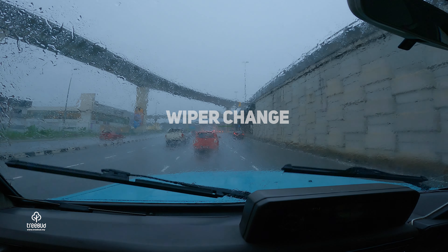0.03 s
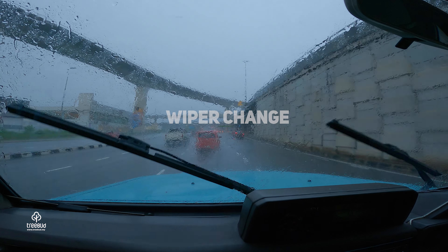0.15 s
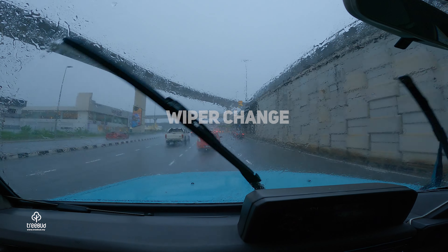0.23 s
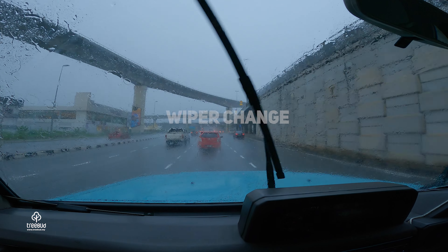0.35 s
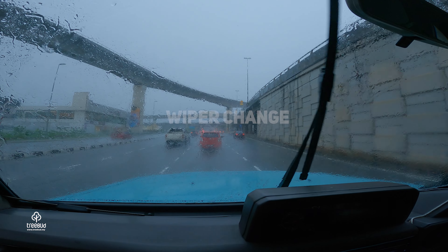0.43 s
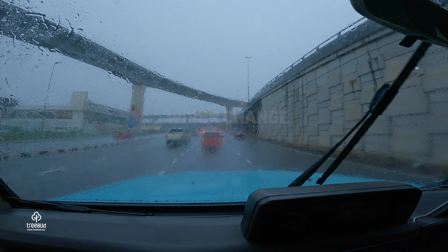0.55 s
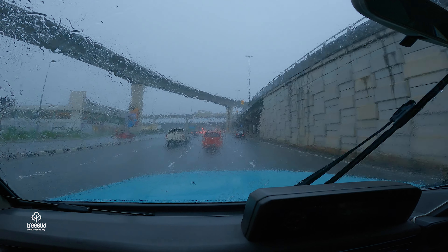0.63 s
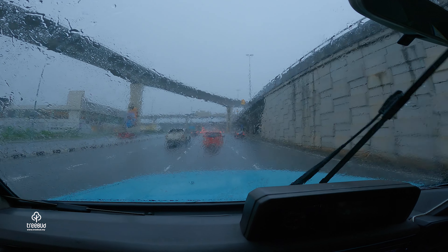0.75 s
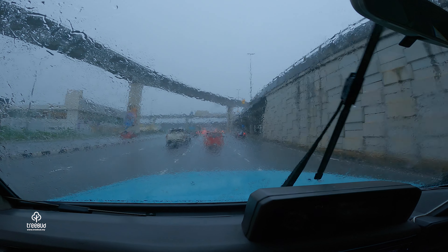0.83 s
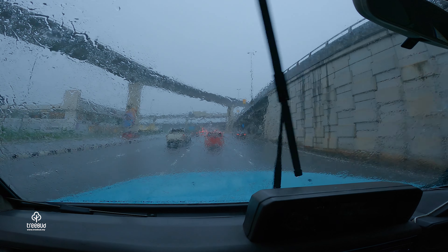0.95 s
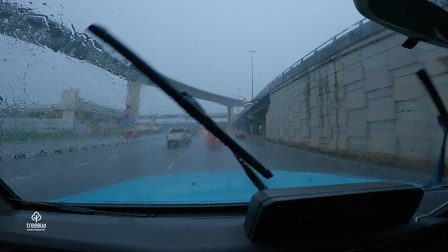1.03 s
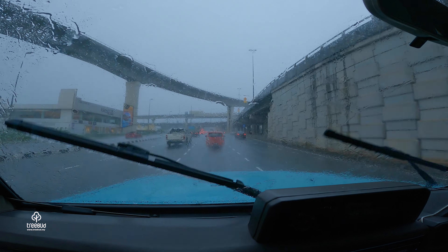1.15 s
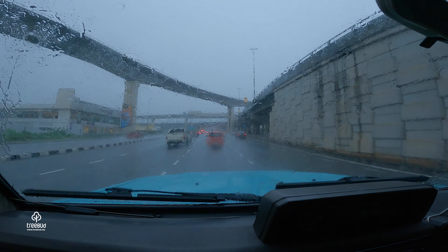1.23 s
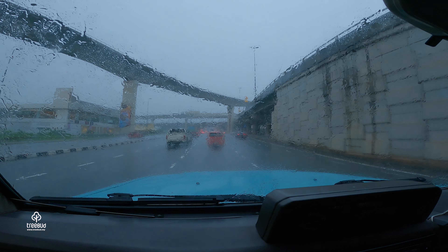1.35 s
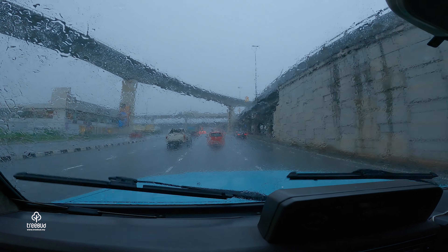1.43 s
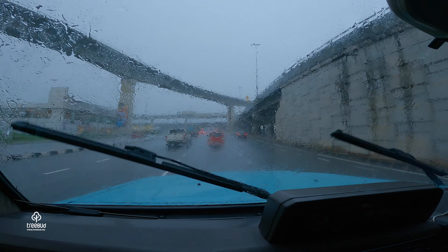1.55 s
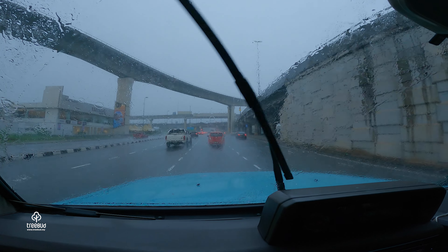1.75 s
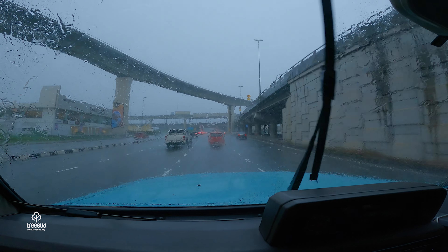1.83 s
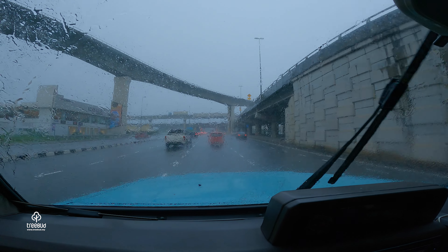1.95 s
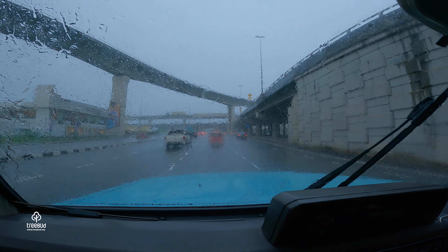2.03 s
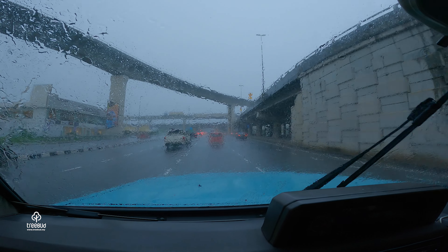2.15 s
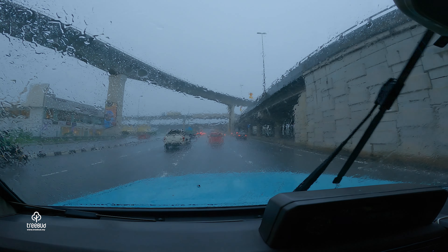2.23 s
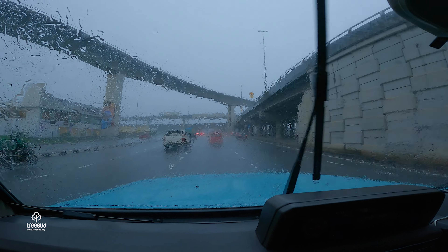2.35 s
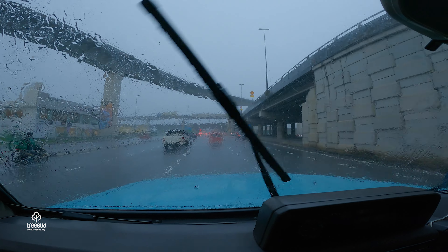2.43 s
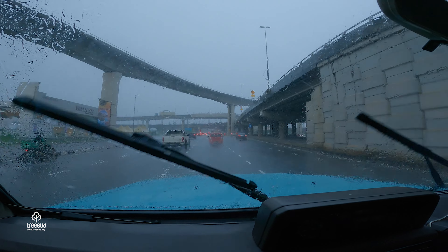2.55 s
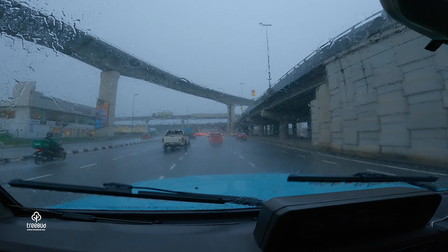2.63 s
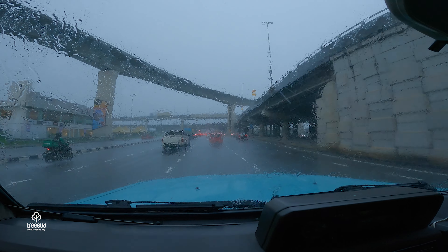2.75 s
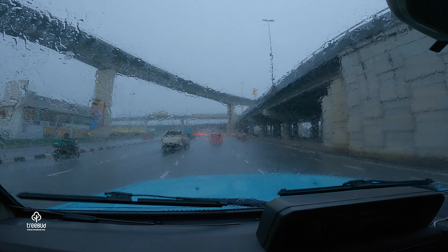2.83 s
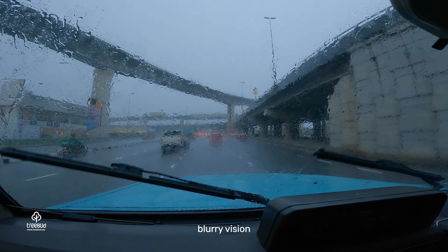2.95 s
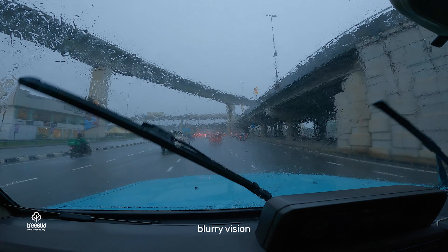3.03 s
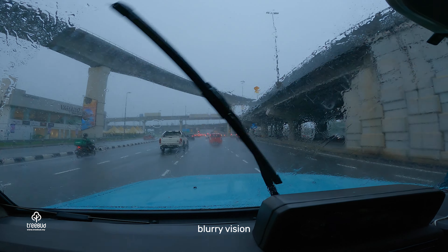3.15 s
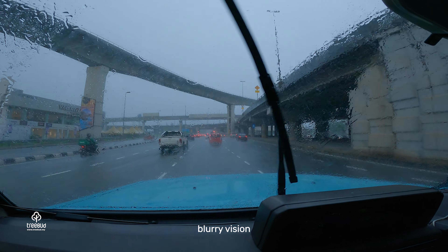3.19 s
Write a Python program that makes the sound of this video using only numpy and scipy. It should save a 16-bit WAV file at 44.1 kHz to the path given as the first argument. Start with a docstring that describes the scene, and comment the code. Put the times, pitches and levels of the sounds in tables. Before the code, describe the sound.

Inside a car driving through rain, wipers knock regularly over tapping drops and engine rumble, fading to a soft, dull roar.

```python
"""Inside a car driving through heavy rain. Drops tap the glass and roof over a hiss of spray. The engine drones
at its firing rate over tyre roar and the rumble of the body shaking on its springs. The wipers thud at the end
of each sweep, then click twice as the rubber blades flip over. Near the end these fade out as a soft, duller
roar with a faint whine fades in."""
import sys
import numpy as np
from scipy import signal
from scipy.fft import rfft, irfft, next_fast_len
from scipy.io import wavfile
from scipy.ndimage import uniform_filter1d

SR = 44100
rng = np.random.default_rng(int(sys.argv[2]) if len(sys.argv) > 2 else 0)


def transcribe(u):
    """Save the signal u as a 16-bit wav file named by the first command-line argument.

    u: samples, shape (n,) or (channels, n), limited to [-1, 1]; the rate is SR.
    q: integer samples, one column per channel.
    """
    v = np.clip(np.atleast_2d(u).T, -1, 1)
    q = np.round(v * 32767).astype(np.int16)
    wavfile.write(sys.argv[1], SR, q)


N = 351512


def gain_of(db):
    """Decibels to gain."""
    return 10 ** (np.asarray(db) / 20)


def panned_gain(db, pan_db):
    """Stereo gains, left pan_db above right."""
    return gain_of(db + np.array([[.5], [-.5]]) * pan_db)


def unit_rms(x):
    """Scales to rms 1."""
    return x / np.sqrt(np.mean(x ** 2) + 1e-20)


def unit_peak(x):
    """Scales to peak 1."""
    return x / abs(x).max()


def at_hz(points, hz):
    """Interpolates a table over log frequency."""
    freq_hz, value = np.transpose(points)
    return np.interp(np.log(hz + 1), np.log(freq_hz + 1), value)


def curve(rows, column=1):
    """One column of a time table at every sample."""
    rows = np.array(rows)
    return np.interp(np.arange(N) / SR, rows[:, 0], rows[:, column])


def fade_out(rows, over_s):
    """Ramp from 1 to 0, ending at a table's last time."""
    return np.clip((rows[-1][0] - np.arange(N) / SR) / over_s, 0, 1)


def add(mix, start_s, sound):
    """Mixes in a stereo sound."""
    part = mix[:, round(start_s * SR):][:, :sound.shape[1]]
    part += sound[:, :part.shape[1]]


def wander(rate_hz):
    """Smooth random drift, rms 1."""
    span = max(int(SR / rate_hz), 1)
    return unit_rms(uniform_filter1d(uniform_filter1d(rng.standard_normal(N), span), span))


def coloured(x, colour):
    """Minimum-phase filter: attacks stay sharp."""
    log_gain = np.log(gain_of(at_hz(colour, abs(np.fft.fftfreq(4096, 1 / SR)))))
    response = np.exp(signal.hilbert(log_gain).conj())
    fir = np.fft.ifft(response).real[:1024] * np.hanning(2048)[1024:]
    return signal.oaconvolve(x, fir[None], axes=1)[:, :x.shape[1]]


def stereo_noise(shape):
    """White noise at two microphone ports, alike in the bass, less so in the treble."""
    # left-right likeness: freq_hz, coherence
    likeness = [(30, 1), (125, 1), (250, 0.98), (500, 0.94), (1000, 0.73), (2000, 0.74), (4000, 0.72),
                (8000, 0.94), (12000, 0.5)]
    # phase lead of the left port: freq_hz, lead_rad
    lead = [(300, -0.056), (800, 0.42), (1500, -0.51), (3000, -0.92), (3800, -0.45), (5900, -0.68),
            (11000, -0.45), (13000, 0)]
    left, other = rfft(rng.standard_normal((2,) + shape))
    hz = np.fft.rfftfreq(shape[-1], 1 / SR)
    coherence = np.clip(at_hz(likeness, hz), 0, 1)
    right = coherence * left * np.exp(-1j * at_hz(lead, hz)) + np.sqrt(1 - coherence ** 2) * other
    return irfft(np.array([left, right]), shape[-1])


def steady_noise(colour):
    """Stereo noise of a given spectrum, rms 1."""
    response = gain_of(at_hz(colour, np.fft.rfftfreq(N, 1 / SR)))
    return unit_rms(irfft(rfft(stereo_noise((N,))) * response, N))


def engine():
    """Firing tone with slightly uneven strokes and fluttering harmonics."""
    # firing tone: time_s, pitch_hz, level_db
    firing = [(0, 68.7, -14), (.5, 69.6, -15), (1.35, 70.3, -15.5), (2.2, 72.9, -17), (2.8, 70.4, -16),
              (3.5, 68.6, -17), (4, 66.63, -15.5), (4.56, 65.2, -16), (5.1, 64.4, -16.5), (5.7, 61.9, -21),
              (5.9, 62.2, -18.5), (6.25, 61.1, -20.5), (6.36, 58.8, -32), (6.45, 57.1, -24.5),
              (6.6, 57, -47)]
    # harmonics relative to the firing tone: time_s, second_db, third_db
    harmonics = [(0, -32, -49), (.5, -13, -32), (.8, -22, -34), (1.3, -15.5, -35), (2, -17, -35.5),
                 (3, -17.5, -32), (4.6, -25.5, -29.5), (5.1, -19.5, -26.5), (5.65, -11.5, -24),
                 (5.95, -23.5, -19.5), (6.4, -13, -21)]
    fourth_db = -36.5
    phase = 2 * np.pi * np.cumsum(curve(firing)) / SR + .14 * wander(30)
    tone = np.cos(phase) * gain_of(0.17 * wander(10))
    for k, db in ((2, curve(harmonics)), (3, curve(harmonics, column=2)), (4, fourth_db)):
        flutter_db = 3.5 * wander(21) + 1.1 * wander(5)
        tone += gain_of(db + flutter_db) * np.cos(k * phase + 1.4 * wander(19))
    return np.sqrt(2) * gain_of(curve(firing, column=2)) * tone * fade_out(firing, over_s=0.057)


def body_rumble():
    """The body shakes on its springs; road bumps set how hard."""
    # base rumble: time_s, level_db
    levels = [(0, -27), (2, -23), (4, -23.5), (5.2, -23), (5.6, -17.5), (6.1, -28), (6.6, -38)]
    # body spectrum: freq_hz, gain_db
    colour = [(10, -22), (18, -6), (26, -3), (34, -4), (42, 0), (52, -3), (62, -6), (85, -18), (110, -40),
              (200, -120)]
    # road bumps: centre_s, swell_db
    bumps = [(.16, 2), (.59, 4), (1.19, 4), (1.43, 4), (1.93, -1), (2.04, 1), (3.1, 2.5), (3.46, 7),
             (3.75, 2.5), (4.22, 7.5), (4.82, 3), (5.06, 2), (5.83, 4), (6.1, 10.5), (6.36, 10.5)]
    half_width_s, uneven_db = 0.041, 0.5
    t = np.arange(N) / SR
    shake = steady_noise(colour)
    envelope = uniform_filter1d(abs(signal.hilbert(shake[0])), 1500)
    shake = unit_rms(shake / (envelope + 0.23))  # flattens the noise's own swells
    bumps_db = sum(db * np.exp(-((t - centre_s) / half_width_s) ** 2) for centre_s, db in bumps)
    level_db = curve(levels) + bumps_db + uneven_db * wander(30)
    return gain_of(level_db) * shake * fade_out(levels, over_s=0.17)


def road_roar():
    """Tyre noise swelling with the road surface; crossfades to the soft roar and whine."""
    # tyre noise: time_s, level_db
    levels = [(0, -34), (1.9, -31.5), (3.3, -31.5), (4.7, -33.5), (5.7, -32.5), (6.25, -33.5), (6.6, -34)]
    # tyre spectrum: freq_hz, gain_db
    colour = [(50, -113), (90, 0), (110, -1.5), (127, -5), (150, -6), (195, -6.5), (230, -13.5), (290, -14),
              (340, -17.5), (400, -14.5), (520, -22), (800, -27), (1000, -21), (2000, -34.5), (5000, -120)]
    tyres = gain_of(curve(levels) + 1.1 * wander(16)) * steady_noise(colour)
    share = fade_out(levels, over_s=0.73)
    return tyres * np.sqrt(share) + (soft_roar() + whine()) * np.sqrt(1 - share)


def patter(bursts, colour, per_s, spread_db):
    """Drop impacts at random times, most small, a few large; rms 1."""
    count = bursts.shape[1]
    sizes = gain_of(spread_db * np.minimum(rng.exponential(1, N), 4))
    hits = sizes * (rng.random(N) < per_s / SR)
    choice = rng.integers(0, count, N)
    impacts = sum(signal.oaconvolve((hits * (choice == k))[None], bursts[:, k], axes=1)[:, :N]
                  for k in range(count))
    return unit_rms(coloured(impacts, colour))


def rain():
    """Spray, roof taps and bright ticks on the glass in quick flurries, plus big drops."""
    # rain strength: time_s, level_db
    levels = [(0, -32), (.25, -37), (.35, -36.5), (.55, -34), (.7, -34), (1, -34.5), (1.15, -35.5),
              (1.3, -33), (1.7, -34), (1.92, -33), (2.1, -38.5), (2.4, -38), (2.65, -34.5), (2.98, -34),
              (3.12, -38), (3.25, -37), (3.4, -33.5), (3.58, -36.5), (3.68, -42), (3.78, -41.5),
              (3.84, -37.5), (4.2, -37), (5.1, -36), (5.65, -37), (5.9, -36.5), (6.2, -40.5), (6.4, -45),
              (6.55, -42)]
    # spray spectrum: freq_hz, gain_db
    spray_colour = [(300, -21), (600, 1.5), (830, -3), (1050, -0.5), (2200, -3.5), (3800, -3.5), (5200, -8),
                    (6800, -16), (8000, -24), (10000, -34), (12500, -29), (15500, -53)]
    # roof tap spectrum: freq_hz, gain_db
    tap_colour = [(300, -18.5), (1000, -2.5), (2200, 1.5), (3800, 5), (5200, 2), (6800, 0.5), (8000, -9.5),
                  (11000, -19), (13000, -24), (15500, -28)]
    # glass tick spectrum: freq_hz, gain_db
    tick_colour = [(1000, -17), (3000, 6), (6000, 0), (9000, -6), (12500, -17), (15500, -18)]
    spray_rel_db, taps_rel_db, ticks_rel_db, flurry_db = -2.5, -3.5, -12.5, 0.72
    t = np.arange(1024) / SR
    attack = 1 - np.exp(-t / 0.00017)
    roof_decay = gain_of(-60 * t / 0.01) + 0.2 * gain_of(-60 * t / 0.21)
    roof_bursts = stereo_noise((24, 1024)) * attack * roof_decay
    glass_bursts = stereo_noise((24, 1024)) * attack * gain_of(-60 * t / 0.021)
    spray = steady_noise(spray_colour) * gain_of(spray_rel_db + 1.45 * wander(65))
    taps = gain_of(taps_rel_db) * patter(roof_bursts, tap_colour, per_s=800, spread_db=4.95)
    ticks = gain_of(ticks_rel_db) * patter(glass_bursts, tick_colour, per_s=370, spread_db=3.4)
    strength = gain_of(curve(levels) + flurry_db * wander(59)) * fade_out(levels, over_s=0.17)
    return strength * (spray + taps + ticks) + big_drops(roof_bursts)


def knock(modes, rise_s):
    """A short scraping blow sets modes ringing; peak 1."""
    t = np.arange(3000) / SR
    blow = stereo_noise((3000,)) * t / rise_s * np.exp(-t / rise_s)
    ring = sum(gain_of(db - 60 * t / t60_s) * np.sin(2 * np.pi * hz * t) for hz, db, t60_s in modes)
    return unit_peak(signal.fftconvolve(blow, ring[None], axes=1)[:, :3000])


def blade_flip(t60_s, ring_db):
    """Dry snap of rubber, hardest at first touch, with a faint tail; the arm rings after it."""
    # rubber snap spectrum: freq_hz, gain_db
    colour = [(1200, -30), (2600, -13), (3500, 0), (6500, -6), (8000, -13), (11000, -22), (15000, -34)]
    # wiper arm modes: freq_hz, gain_db, t60_s
    arm_modes = [(1290, -18, 0.014), (2440, -5, 0.016), (3850, 4, 0.016), (5100, -3, 0.013),
                 (6080, -8, 0.013)]
    t = np.arange(3000) / SR
    scrape = stereo_noise((3000,)) * (gain_of(-60 * t / t60_s) + 0.15 * gain_of(-60 * t / 0.059))
    snap = unit_peak(coloured(scrape + 3 * (t == 0), colour))
    return unit_peak(snap + gain_of(ring_db) * knock(arm_modes, rise_s=0.00037))


def wipers():
    """The arms thud at the end of a sweep, then the two blades flip in turn."""
    # sweep ends: start_s, peak_db
    thuds = [(1.429, -27), (2.859, -31), (4.287, -25), (5.712, -23.5)]
    # cowl modes: freq_hz, gain_db, t60_s
    cowl_modes = [(600, -8, .012), (950, 0, .02), (1250, -4, .014), (1700, -9, .012)]
    # blade flips: start_s, peak_db, ring_db
    flips = [(.076, -13, -11), (0.0965, -13, -6), (1.5045, -15, -8), (1.5278, -14, -6),
             (2.9377, -12.5, -16), (2.9566, -14.5, -10), (4.359, -17, -9), (4.3859, -13, 1),
             (5.7841, -15.5, -14), (5.8083, -13, 4)]
    # first and second blade: pan_db, t60_s
    blades = [(2.7, .011), (-1.6, 0.028)]
    out = np.zeros((2, N))
    for start_s, peak_db in thuds:
        add(out, start_s, gain_of(peak_db) * knock(cowl_modes, rise_s=0.004))
    for k, (start_s, peak_db, ring_db) in enumerate(flips):
        pan_db, t60_s = blades[k % 2]
        add(out, start_s, panned_gain(peak_db, pan_db) * blade_flip(t60_s, ring_db))
    return out


def big_drops(bursts):
    """Big drops spread as they land and die fast."""
    # landings: start_s, peak_db, pan_db
    drops = [(0.3085, -22, 3), (0.321, -16.5, -3), (0.3302, -20, 0), (0.4544, -23, -3), (0.4923, -21, 2),
             (0.5457, -22, .5), (0.582, -23, -3), (0.89, -19, -1), (0.9205, -17.5, 1), (0.9687, -14, 0),
             (1.3572, -22, 5), (1.4411, -24, -3), (1.5414, -17, 1), (1.8377, -23, -2), (1.949, -24, -1),
             (2.2431, -27, 1), (2.3106, -24, 2), (2.4109, -26, -2), (2.6675, -29, 1), (2.7036, -17.5, 2.5),
             (2.7439, -17.5, -3), (2.9878, -20.5, -1), (3.3497, -21.5, 4), (3.4201, -22.5, 1),
             (3.5449, -18, 1), (3.8173, -22, 1), (3.83, -22, 1), (4.1953, -22, -3), (4.5924, -23, -4),
             (4.7246, -21, 1), (4.8573, -22, -10), (4.9583, -27, -15), (4.995, -20.5, -1),
             (5.2821, -22, -3), (5.665, -30, -6), (5.8435, -24, -2)]
    # splat spectrum: freq_hz, gain_db
    colour = [(800, -19), (2200, -3.5), (3800, -1.5), (6300, -1), (8000, -12), (11000, -19.5), (15500, -31)]
    spread_s, damping_t60_s = 0.00054, 0.048
    t = np.arange(bursts.shape[2]) / SR
    envelope = (1 - np.exp(-t / spread_s)) * gain_of(-60 * t / damping_t60_s)
    out = np.zeros((2, N))
    for k, (start_s, peak_db, pan_db) in enumerate(drops):
        splat = coloured(bursts[:, k % bursts.shape[1]] * envelope, colour)
        add(out, start_s, panned_gain(peak_db, pan_db) * unit_peak(splat))
    return out


def soft_roar():
    """Dull, gently swelling roar."""
    # roar spectrum: freq_hz, gain_db
    colour = [(12, -32), (22, 0.5), (70, 2), (99, -2.5), (130, 0.5), (161, -8), (270, -10), (405, -20.5),
              (760, -21), (1020, -18.5), (1660, -28.5), (2500, -34), (4050, -38), (7500, -44.5),
              (8300, -49), (10500, -56.5), (13500, -77), (15000, -95)]
    level_db, swell_db = -30.5, 0.73
    return gain_of(level_db + swell_db * wander(7.6)) * steady_noise(colour)


def whine():
    """Faint, thin, wavering tone."""
    # whine tone: pitch_hz, level_db
    tones = [(4000, -70.5)]
    t = np.arange(N) / SR
    return sum(np.sqrt(2) * gain_of(db + 2.5 * wander(8)) * np.sin(2 * np.pi * hz * t + .6 * wander(15))
               for hz, db in tones)


def scene():
    """All sources in the cabin, in stereo."""
    return road_roar() + engine() + body_rumble() + rain() + wipers()


def record(dry):
    """Band-limited microphone; its two ports differ slightly in sensitivity and dull at the top."""
    # port imbalance: freq_hz, pan_db
    imbalance = [(60, 0.46), (250, 0.3), (500, 1.5), (1000, 1.9), (2000, 2), (4000, 0.1), (8000, 1.5),
                 (12000, 3)]
    # treble roll-off: freq_hz, gain_db
    rolloff = [(12500, 0), (14000, -6), (15800, -16)]
    cutoff_hz = 15800
    size = next_fast_len(N + 8192)
    hz = np.fft.rfftfreq(size, 1 / SR)
    end_fade = np.sin(np.pi / 2 * np.clip((N - np.arange(N)) / 300, 0, 1)) ** 2
    response = panned_gain(at_hz(rolloff, hz), at_hz(imbalance, hz))
    ports = irfft(rfft(dry * end_fade, size) * response, size)
    lowpass = signal.firwin(511, cutoff_hz, window=("kaiser", 9), fs=SR)
    return signal.oaconvolve(ports[:, :N], lowpass[None], "same")


dry = scene()
out = record(dry)
transcribe(out)
```